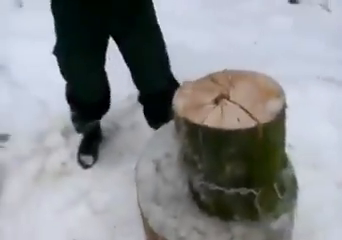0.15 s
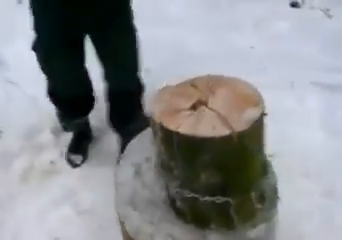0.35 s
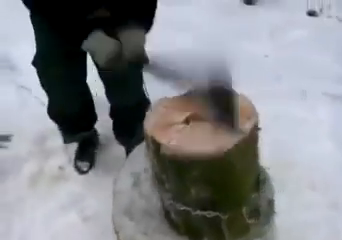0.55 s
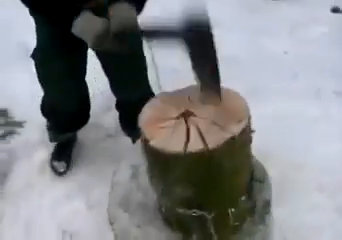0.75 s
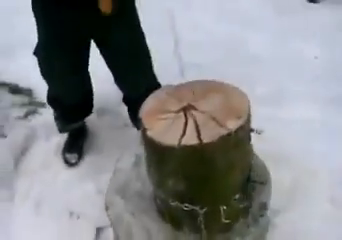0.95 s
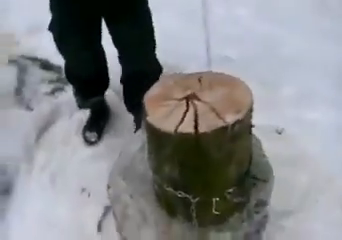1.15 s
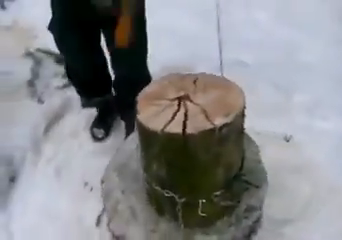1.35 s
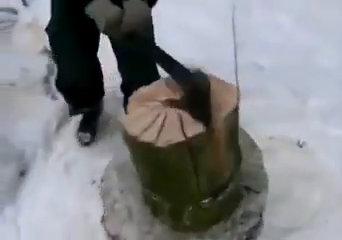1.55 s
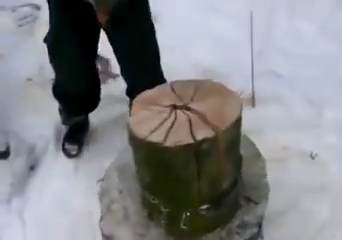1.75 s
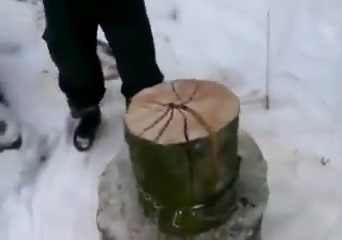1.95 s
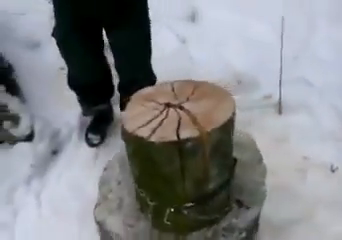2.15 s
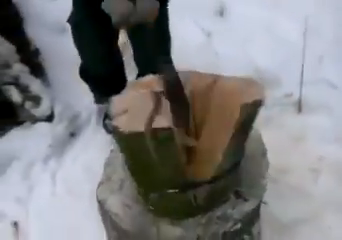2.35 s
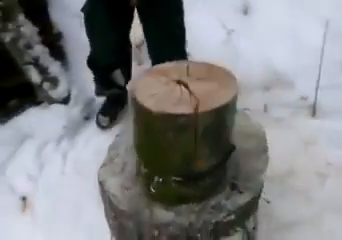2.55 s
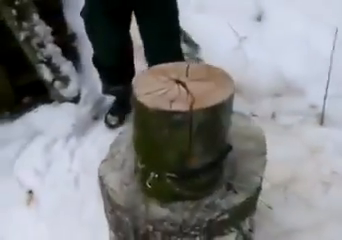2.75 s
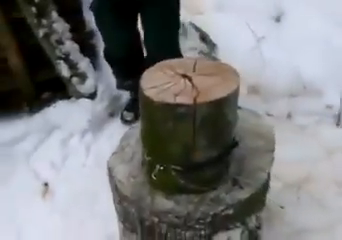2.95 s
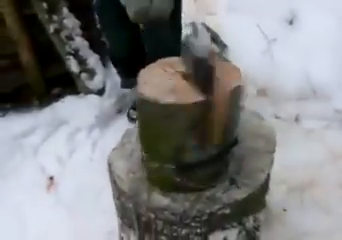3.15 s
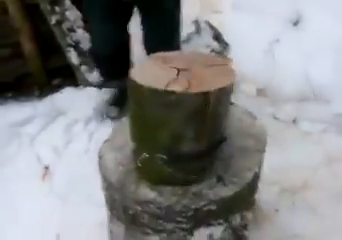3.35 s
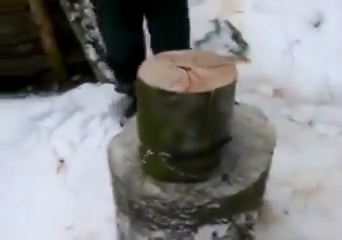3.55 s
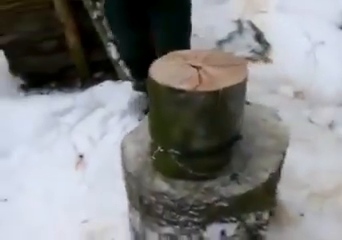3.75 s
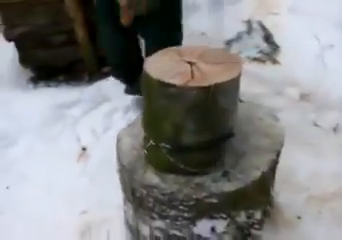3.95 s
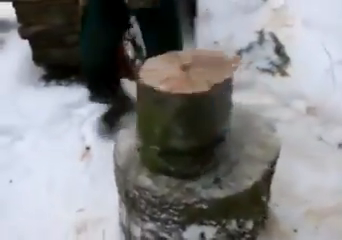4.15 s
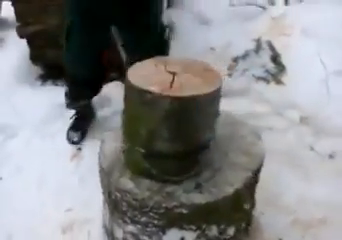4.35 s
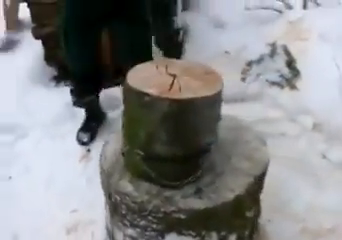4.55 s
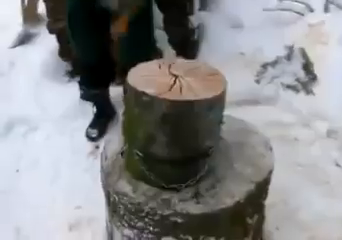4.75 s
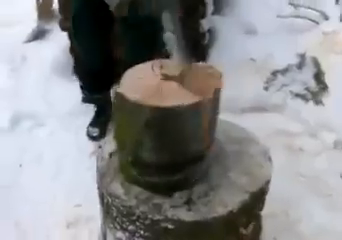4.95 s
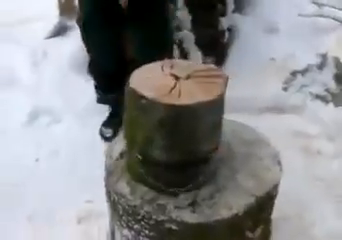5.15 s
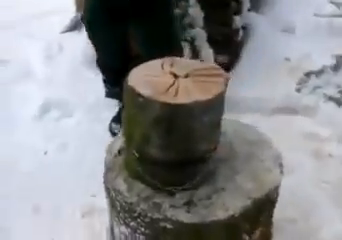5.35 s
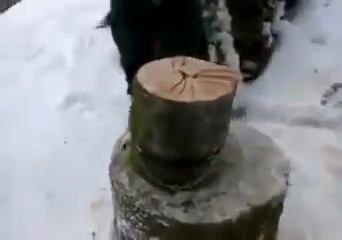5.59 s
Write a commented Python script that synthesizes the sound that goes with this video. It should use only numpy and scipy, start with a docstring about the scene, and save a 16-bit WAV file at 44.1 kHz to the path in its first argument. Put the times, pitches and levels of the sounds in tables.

```python
"""Hard chops of an axe splitting a chained log on a block in a snowy yard.
Each chop cracks and tears fibres; the pieces slap back in knocks, with snaps, thuds and chain chinks.
Contacts are noise bursts through resonances; the handle hums as a wavering sine.
Chips, clothes and boots rustle as shaped grains over a steady noise of the yard."""
import sys
import numpy as np
from scipy import signal
from scipy.fft import rfft, irfft
from scipy.io import wavfile

SR = 44100
rng = np.random.default_rng(int(sys.argv[2]) if len(sys.argv) > 2 else 0)


def master_out(mix):
    """Clip the mix to full scale and print it as 16-bit PCM to the path in sys.argv[1]."""
    frames = np.transpose(np.atleast_2d(mix))
    ceiling = np.clip(frames, -1, 1)
    pcm = np.round(ceiling * 32767).astype(np.int16)
    wavfile.write(sys.argv[1], SR, pcm)


N = 247842

# Blade landings, the first before the start. Each row: landing in s, body level in dB, body pitch in Hz,
# crack in dB re body, decay scale in s, block thud in dB re body, tearing in dB, tearing t60 in s,
# handle hum in dB, dull debris in dB, bright debris in dB (hum and debris before their envelopes).
CHOPS = [(-0.12, 0, 700, -7, .045, -21, -20, .1, -51, -46, -46),
         (0.716, 5.5, 617, -8.5, 0.033, -25.5, -15.5, 0.11, -49.5, -45.5, -59.5),
         (1.594, -1, 598, -5, 0.059, -31, -11, 0.094, -45.5, -47, -48.5),
         (2.478, 1.5, 794, -8.5, 0.029, -34.5, -19, 0.083, -38.5, -48.5, -53.5),
         (3.307, 2, 665, -16, 0.054, -20, -13, 0.049, -43.5, -48, -48),
         (4.154, 2, 832, -6, 0.041, -31, -14.5, 0.059, -42.5, -43.5, -46.5),
         (4.978, 4, 1197, -2.5, 0.031, -55, -7, 0.046, -45, -47, -60.5)]


def amp(db):
    """Gain of a level in dB."""
    return 10 ** (np.asarray(db) / 20)


def rms_one(x):
    """Scaled to rms 1."""
    return x / np.sqrt(np.mean(x ** 2) + 1e-20)


def peak_one(x):
    """Scaled to peak 1."""
    return x / np.max(np.abs(x))


def butter(x, order, hz, kind):
    """Butterworth filter."""
    return signal.sosfilt(signal.butter(order, hz, kind, fs=SR, output="sos"), x)


def colour(x, spectrum):
    """Filters by a table of (Hz, dB), interpolated over log frequency."""
    hz, db = np.transpose(spectrum)
    grid_hz = np.maximum(np.arange(len(x) // 2 + 1) * SR / len(x), 1)
    gain = amp(np.interp(np.log(grid_hz), np.log(hz), db))
    return irfft(rfft(x) * gain, len(x))


def ring(x, hz, t60):
    """One damped mode driven by x; t60 in s."""
    r, w = amp(-60 / (t60 * SR)), 2 * np.pi * hz / SR
    return signal.lfilter([0, np.sin(w)], [1, -2 * r * np.cos(w), r * r], x)


def add(out, s, x):
    """Mixes x in at time s."""
    i = round(s * SR)
    out[max(i, 0):i + len(x)] += x[max(-i, 0):N - i]


def burst(t60, rise_s=0.00069):
    """Noise that swells briefly and dies away."""
    t = np.arange(SR // 4) / SR
    swell = np.minimum(t / rise_s, 1) ** 2
    decay = amp(-60 * t / max(t60, .003))
    return rng.standard_normal(len(t)) * swell * decay + 1e-18


def grainy(per_s, spread_db, hiss):
    """Clicks of uneven size over plain noise; rms 1."""
    sizes = amp(spread_db * np.minimum(rng.exponential(1, N), 4)) * rng.standard_normal(N)
    clicks = sizes * (rng.random(N) < per_s / SR)
    return rms_one(rms_one(clicks) + hiss * rng.standard_normal(N))


def wander(per_s):
    """Slow random signal of rms 1: noise through two equal lowpass poles at per_s Hz."""
    r = np.exp(-2 * np.pi * per_s / SR)
    slow = signal.lfilter([1], [1, -2 * r, r * r], rng.standard_normal(N + SR))
    return rms_one(slow[SR:])     # the first second lets the filter settle


def flicker(per_s, depth_db):
    """A gain that wavers at random, depth_db rms."""
    return amp(depth_db * wander(per_s))


def blow(level_db, pitch_hz, thud_db, crack_db, t60, own_db, tilt_db, rise_s):
    """A rough contact drives the log modes near its pitch, the piece's own ring and the block; a crack tops it."""
    # Log modes. Each row: frequency in Hz, level in dB before the pitch weighting, t60 in s.
    log_modes = [(280, -2, 0.067), (390, -35, 0.012), (653, -15.5, 0.054), (690, 0.5, 0.028),
                 (799, 5.5, 0.023), (1007, 8, 0.015), (1264, 19.5, 0.0061), (1402, 2, 0.034),
                 (1526, 14, 0.011), (1797, 8.5, 0.015), (2050, 13.5, 0.014), (2720, 16, 0.0087)]
    # Chopping block modes. Each row: frequency in Hz, relative level in dB, t60 in s.
    block_modes = [(60, -2, 0.038), (203, -1.5, 0.018), (263.4, -5, 0.02)]
    contact = burst(0.45 * t60, rise_s) + amp(-14.0) * burst(1.35 * t60, rise_s)     # slap, then grinding
    contact[round(rise_s * SR)] -= 2.5     # the hard moment of the touch
    contact = signal.lfilter([1], [1, -.7], contact)     # wood yields, so the push is blunt

    octaves = np.log2(np.array(log_modes)[:, 0] / pitch_hz)
    weights_db = rng.normal(0, 2.5, len(log_modes)) + tilt_db * octaves
    weights_db = weights_db - 8.2 * octaves ** 2     # modes far from the pitch get less
    body = sum(amp(db + weight_db) * ring(contact, hz, mode_t60)
               for (hz, db, mode_t60), weight_db in zip(log_modes, weights_db))
    own_ring = ring(contact, pitch_hz, min(0.46 * t60, .03))
    body = peak_one(body) + amp(own_db) * peak_one(own_ring)
    body = butter(body, 3, 210, "high")     # small pieces radiate no bass

    block_thud = sum(amp(db) * ring(contact, hz, mode_t60) for hz, db, mode_t60 in block_modes)
    crack = butter(burst(0.64 * t60, 0.86 * rise_s), 2, [2200, 6500], "band")
    mix = peak_one(body) + amp(thud_db) * peak_one(block_thud) + amp(crack_db) * peak_one(crack)
    return amp(level_db) * mix


def chops(out):
    """The blade strikes: a blow and fibres tearing as decaying grains; apart from these, a faint noise precedes."""
    # Tearing spectrum. Each row: frequency in Hz, relative level in dB.
    tearing = [(59, -38.5), (100, -27.5), (449, 0), (1120, 9.5), (2450, 2), (3340, 7), (5440, -2.5),
               (8690, -24.5), (9960, 11), (10600, -76.5), (13700, -64), (22000, -120)]
    noise_s, noise_db = 0.0081, -27.5     # faint noise just before the strike, not part of it
    fibres = rms_one(colour(grainy(per_s=1900, spread_db=1.5, hiss=0.56), tearing))
    t = np.arange(SR // 4) / SR
    for s, db, hz, crack_db, t60, thud_db, tear_db, tear_t60, *_ in CHOPS:
        add(out, s, blow(db, hz, thud_db, crack_db, t60, own_db=-16, tilt_db=0, rise_s=0.001143))
        grains = np.roll(fibres, -round(s * SR))[:len(t)]
        add(out, s, grains * amp(tear_db - 60 * (t / tear_t60) ** 0.78))
        noise = grains[:round(noise_s * SR)]
        noise = amp(noise_db) * noise * np.linspace(.3, 1, len(noise))
        add(out, s - noise_s, np.r_[noise, 0 * t])     # padded past the start of the scene


def knocks(out):
    """Wood slaps on wood: softer-edged blows with modes tilted to the treble."""
    # Each row: time in s, body level in dB, body pitch in Hz, crack in dB re body, decay scale in s,
    # struck piece's own ring in dB re log modes.
    knock_rows = [(0.004, -23.5, 1100, -3, 0.038, -3), (0.118, -39, 1510, -5.5, 0.2, 5),
                  (0.521, -30.5, 635, -15, 0.046, 5.5), (0.744, -2, 706, -21.5, 0.058, -27),
                  (0.83, -24.5, 406, -11.5, 0.1, -5), (0.84, -13, 490, -20, 0.054, -10.5),
                  (0.842, -16.5, 1300, -24, 0.065, 2), (0.865, -20.5, 874, -33, 0.025, 11),
                  (0.886, -30, 899, -20, 0.053, -7), (1.129, -32.5, 615, -15, 0.12, 0),
                  (1.434, -38.5, 600, -12, 0.27, 3), (1.601, -11.5, 684, 3.5, 0.038, -3),
                  (1.629, -8.5, 487, -12, 0.049, -6.5), (1.644, -22.5, 820, -45, 0.044, -7),
                  (1.838, -34.5, 413, -9, 0.27, 6), (2.337, -39.5, 520, -9, 0.25, -1.5),
                  (2.396, -38.5, 770, -23, 0.041, 2.5), (2.483, -2.5, 820, -25, 0.046, -3),
                  (2.494, -3, 979, -9.5, 0.1, -18.5), (2.665, -18.5, 597, -10, 0.051, -16),
                  (2.679, -20, 1630, -10.5, 0.079, -10), (3.237, -35.5, 430, -11.5, 0.048, -3),
                  (3.313, -7, 590, -7, 0.07, -9), (3.331, -3.5, 720, -15, 0.03, 14),
                  (3.396, -12.5, 1200, -19, 0.07, 8.5), (3.986, -40, 1045, -5, 0.39, -9),
                  (4.029, -34.5, 473, -16.5, 0.087, -2), (4.164, -8, 1320, -28, 0.067, -17),
                  (4.169, -14.5, 475, -15, 0.069, -12.5), (4.179, -4.5, 860, -24.5, 0.071, -4),
                  (4.195, -18.5, 1370, -30, 0.059, -12), (4.223, -27, 1200, -8, 0.031, 0),
                  (4.251, -14.5, 910, -34, 0.031, 12), (4.26, -26, 1120, -20, 0.21, -13),
                  (4.321, -24, 1960, -28, 0.12, 1), (4.333, -4.5, 954, -42, 0.043, -12),
                  (4.341, -13, 1400, -12.5, 0.042, -25), (4.357, -28.5, 958, -11, 0.12, -9),
                  (4.838, -34.5, 990, -9.5, 0.18, -12.5), (4.93, -33.5, 854, -16.5, 0.035, -3.5),
                  (4.987, -2, 1075, -24, 0.041, 2.5), (4.996, -1.5, 1210, -20.5, 0.064, -8.5),
                  (5.155, -9.5, 1470, -13.5, 0.082, -4), (5.163, -11.5, 1130, -28, 0.052, 10),
                  (5.555, -28.5, 546, -20.5, 0.069, -1)]
    full_scale_thud_db, thud_follows = -31.5, 0.27     # share of the knock's level swing the thud takes
    for s, db, hz, crack_db, t60, own_db in knock_rows:
        thud_db = full_scale_thud_db + (thud_follows - 1) * db
        add(out, s - .0005, blow(db, hz, thud_db, crack_db, t60, own_db, tilt_db=5, rise_s=0.001962))


def snap(level_db, hz, t60, rise_s):
    """A broad crackle of several fibres with a damped ring at its pitch."""
    crack = burst(t60, rise_s)
    crack = crack * amp(4.0 * rng.standard_normal(len(crack)))     # uneven grains
    broad = butter(crack, 1, [900, 6500], "band")
    pitched = ring(crack, hz, .003)
    return amp(level_db + 2.5) * peak_one(.5 * peak_one(pitched) + peak_one(broad))


def snaps(out):
    """Fibres and chips snap."""
    # Each row: time in s, level in dB before a 2.5 dB lift, pitch in Hz, crackle t60 in s.
    snap_rows = [(0.013, -32, 5400, 0.052), (0.0243, -32, 3620, 0.11), (0.0428, -27.5, 3850, 0.029),
                 (0.112, -37.5, 4230, 0.034), (0.7284, -14, 2720, 0.028), (0.84, -24.5, 3330, 0.014),
                 (1.6113, -9.5, 5900, 0.021), (1.6173, -16.5, 3570, 0.038), (1.6228, -9.5, 4440, 0.016),
                 (1.698, -33, 2400, 0.019), (1.925, -29.5, 3570, 0.07), (2.0348, -48.5, 4400, 0.064),
                 (2.4823, -3.5, 5690, 0.063), (2.5093, -19.5, 4160, 0.036), (2.5396, -28.5, 5840, 0.025),
                 (2.59, -35.5, 3800, 0.035), (2.648, -33, 5640, 0.037), (2.6891, -33, 2820, 0.084),
                 (2.858, -37, 3160, 0.032), (3.1953, -35, 6200, 0.034), (3.326, -16.5, 3770, 0.038),
                 (3.4087, -35, 3920, 0.055), (3.492, -33, 3520, 0.02), (3.5311, -28.5, 5450, 0.023),
                 (3.549, -38.5, 3040, 0.026), (3.9918, -45, 2660, 0.062), (4.293, -47, 4570, 0.026),
                 (4.3428, -14.5, 4060, 0.019), (5.1137, -28, 3000, 0.1)]
    rise_s = .0042
    for s, *contact in snap_rows:
        add(out, s + 0.0016 - rise_s, snap(*contact, rise_s))


def thud(level_db, hz, t60, edge_db):
    """A soft, heavy contact: one blunt push into a damped low resonance, with a dull edge."""
    push = burst(.5 * t60, rise_s=0.0026)
    push[90] -= 6.0     # the touch, 2 ms in
    blunt = signal.lfilter([1], [1, -.9], push)
    low = ring(blunt, hz, min(.5 * t60, .03))
    edge = butter(push, 3, [300, 950], "band")
    both = peak_one(low) + amp(edge_db) * peak_one(edge)
    return amp(level_db + 2.0) * peak_one(butter(both, 2, 90, "high"))


def thuds(out):
    """Boots stamp and the log settles on the block."""
    # Each row: time in s, level in dB before a 2 dB lift, pitch in Hz, decay scale in s.
    thud_rows = [(0.118, -39, 222, 0.084), (1.068, -36.5, 155, 0.032), (1.097, -40, 278, 0.052),
                 (1.132, -21.5, 211, 0.079), (1.14, -29.5, 202, 0.11), (1.152, -34, 210, 0.097),
                 (1.165, -31, 225, 0.082), (1.436, -37.5, 303, 0.057), (2.281, -39, 234, 0.065),
                 (2.841, -31, 180, 0.063), (2.875, -39, 219, 0.068), (2.899, -37.5, 183, 0.047),
                 (3.36, -32, 150, 0.034), (3.657, -29.5, 130, 0.19), (3.68, -38, 264, 0.07),
                 (3.986, -40, 151.3, 0.027), (4.059, -30.5, 223, 0.13), (4.504, -32, 242, 0.068),
                 (4.532, -31.5, 263, 0.054), (4.621, -34.5, 161, 0.032), (4.629, -25.5, 207, 0.091),
                 (4.898, -37, 150, 0.051), (4.93, -31, 248, 0.036), (5.243, -34, 155, 0.019),
                 (5.554, -26.5, 284, 0.086), (5.595, -38, 168, 0.032)]
    for s, *contact in thud_rows:
        add(out, s - .0005, thud(*contact, edge_db=-1))


def chinks(out):
    """Chain links touch: a soft burst rings the link."""
    # Each row: time in s, peak in dB.
    chink_rows = [(0.0674, -54), (0.17, -51.5), (0.362, -50.5), (1.784, -46.5), (1.925, -39)]
    # Link modes. Each row: frequency in Hz, relative level in dB, t60 in s.
    link_modes = [(7780, 0, .05)]
    for s, peak_db in chink_rows:
        link = sum(amp(db) * ring(burst(0.028, rise_s=0.0074), hz, t60) for hz, db, t60 in link_modes)
        add(out, s - .003, amp(peak_db) * peak_one(link))


def impacts():
    """All contacts: chops, knocks, thuds, snaps and chinks."""
    out = np.zeros(N)
    for source in (chops, knocks, thuds, snaps, chinks):
        source(out)
    return out


def swell_db(t, rise_s):
    """Level of a linear rise to 0 dB over rise_s."""
    return 20 * np.log10(np.clip(t / rise_s, 1e-9, 1))


def after_chops(column, shape_db):
    """Power sum of one envelope per chop; shape_db gives dB for seconds since the chop."""
    t = np.arange(N) / SR
    return np.sqrt(sum(amp(row[column] + shape_db(t - row[0])) ** 2 for row in CHOPS))


def handle():
    """A sine set off by each chop: it swells, sags, then the hands damp it; the grip wavers its pitch."""
    rise_s, free_s = 0.062, 0.3
    free_db_per_s, gripped_db_per_s = 22, 91

    def shape_db(t):
        sag_db = free_db_per_s * np.clip(t, 0, free_s)
        return swell_db(t, rise_s) - sag_db - gripped_db_per_s * np.maximum(t - free_s, 0)

    hz = 140.5 * flicker(per_s=4.0, depth_db=.06)
    level = after_chops(column=8, shape_db=shape_db)
    return np.sqrt(2) * level * np.sin(2 * np.pi * np.cumsum(hz) / SR)


def rustle_level(chop_column, scuff_column, db_per_s):
    """Chips and bark trickling down after each chop, plus swells as cloth and boots scuff."""
    # Each row: top in s, half length in s, dull level in dB, bright level in dB (before the flicker).
    scuffs = [(.36, 0.033, -48, -55.5), (0.922, 0.069, -50, -47), (1.48, 0.045, -64.5, -59),
              (1.767, 0.024, -70, -52), (2.333, 0.074, -61, -64.5), (2.582, 0.072, -45, -48.5),
              (2.669, 0.05, -40, -38), (2.844, .035, -45, -43.5), (3.21, 0.049, -52, -63),
              (3.532, 0.093, -45, -52), (4.06, 0.083, -54, -60), (4.229, 0.014, -40, -39),
              (4.285, .04, -57, -51), (4.529, 0.041, -49.5, -63), (4.889, 0.061, -48, -57.5),
              (5.115, 0.031, -52.5, -44.5), (5.597, 0.066, -49.5, -50.5)]
    rise_s = 0.14
    t = np.arange(N) / SR
    debris = after_chops(chop_column,
                         lambda t: swell_db(t, rise_s) - db_per_s * np.maximum(t - rise_s, 0))
    swells = [amp(row[scuff_column]) * np.exp(-((t - row[0]) / row[1]) ** 2) for row in scuffs]
    return np.sqrt(debris ** 2 + sum(swell ** 2 for swell in swells))


def patchy(x, per_s, depth_db):
    """Each of six treble bands wavers on its own."""
    edges_hz = np.geomspace(900, 10500, 7)
    return sum(flicker(per_s, depth_db) * butter(x, 2, pair, "band")
               for pair in zip(edges_hz, edges_hz[1:]))


def rustle():
    """Chips, cloth and snow: clumped grains in a dull and a bright share."""
    # Spectra of the two shares. Each row: frequency in Hz, relative level in dB.
    dull_spectrum = [(94, -20.5), (160, -5), (204, -1.5), (387, -4.5), (880, -6.5), (1170, -3),
                     (2240, -15.5), (3000, -29.5), (3900, -57), (6600, -120)]
    bright_spectrum = [(1180, -29.5), (2000, -8.5), (2220, -5.5), (3100, -2.5), (6070, -11), (8010, -18.5),
                       (9800, -27), (10500, -47.5), (13600, -76), (22000, -120)]
    clumps = flicker(per_s=12.0, depth_db=2.5)
    dull = rms_one(colour(grainy(per_s=800, spread_db=3.0, hiss=0.7), dull_spectrum))
    bright = rms_one(colour(grainy(per_s=1800, spread_db=4.0, hiss=.8), bright_spectrum))
    bright = flicker(per_s=30, depth_db=2.5) * patchy(bright, per_s=25, depth_db=2.2)
    dull_level = rustle_level(chop_column=9, scuff_column=2, db_per_s=40)
    bright_level = rustle_level(chop_column=10, scuff_column=3, db_per_s=53.5)
    return clumps * (dull_level * dull + bright_level * bright)


def yard():
    """Steady noise, shaped by the yard's spectrum."""
    # Each row: frequency in Hz, relative level in dB.
    yard_spectrum = [(12, -23), (20, 11), (91, 0.5), (275, -4.5), (386, -10.5), (603, -2.5), (1050, -8.5),
                     (1910, -15), (7280, -24.5), (8740, -31), (10500, -53.5), (13600, -97.5), (22000, -120)]
    return amp(-54) * rms_one(colour(rng.standard_normal(N), yard_spectrum))


def hush():
    """Gain of the background: it drops out just before each chop and is back as the blade lands."""
    from_s, to_s, depth_db = 0.028, .009, -35     # times before the chop
    t = np.arange(N) / SR
    gain = np.ones(N)
    for s, *_ in CHOPS:
        corners_s = [-from_s - .003, -from_s, -to_s, 0]
        gain = gain * amp(np.interp(t - s, corners_s, [0, depth_db, depth_db, 0]))
    return gain


def scattered(mid):
    """Side signal: three short scattered paths, each with a wandering gain, reach the sides unequally."""
    # Each row: frequency in Hz, side in dB re the signal fed in.
    width = [(60, -8), (110, -18), (190, -20.5), (330, -13.5), (590, -20), (1040, -10.5), (1830, -4.5),
             (3240, -2), (5720, 1), (10100, 8)]
    side = 0
    for _ in range(3):
        paths = burst(0.02, rise_s=0.00018)[:SR // 60]
        side = side + wander(7.7) * signal.fftconvolve(mid, paths / np.linalg.norm(paths))[:N]
    return colour(side / np.sqrt(3), width)


def scene():
    """All sources, nearly centred, wider in the treble; the near blows are the narrowest."""
    background = hush() * (rustle() + handle() + yard())
    blows = impacts()
    mid = blows + background
    side = scattered(amp(-7.5) * blows + background)
    return np.array([mid + side, mid - side]) * amp([[.3], [-.3]])


def record(dry):
    """The input overloads, the lowest bass is weakened, peaks clip again and the top is cut."""
    blocked = butter(np.clip(dry, -.92, .92), 1, 45, "high")
    top_cut = signal.cheby2(8, 45, 10700, fs=SR, output="sos")     # 45 dB down from 10.7 kHz
    return signal.sosfilt(top_cut, np.clip(blocked, -.9, .9))


dry = scene()
out = record(dry)
master_out(out)
```